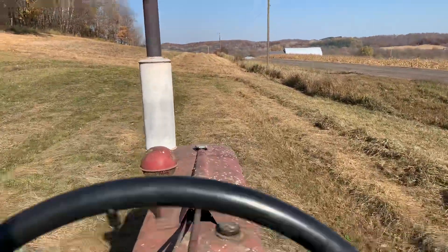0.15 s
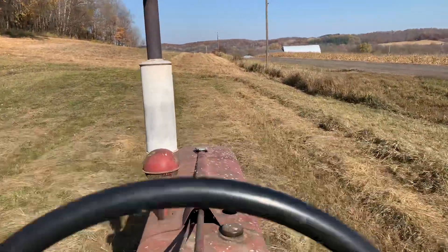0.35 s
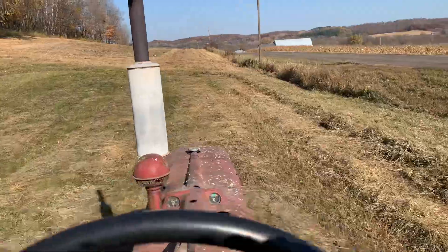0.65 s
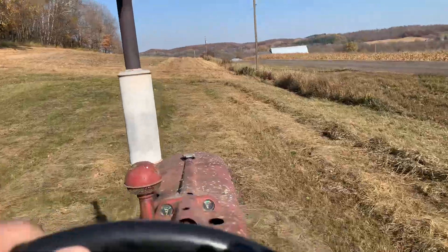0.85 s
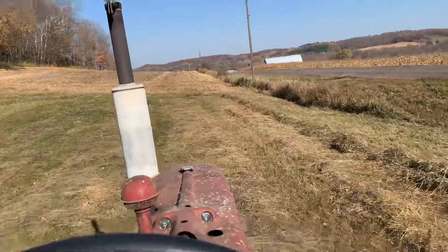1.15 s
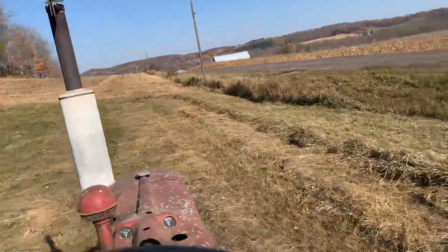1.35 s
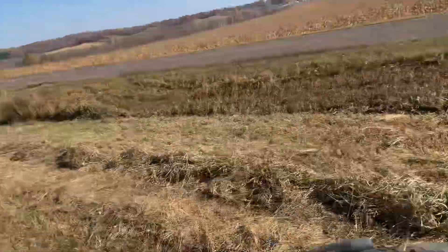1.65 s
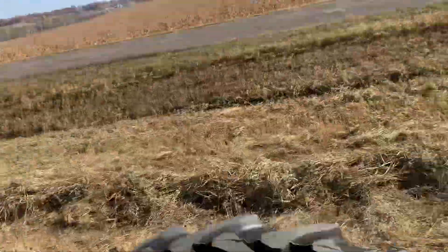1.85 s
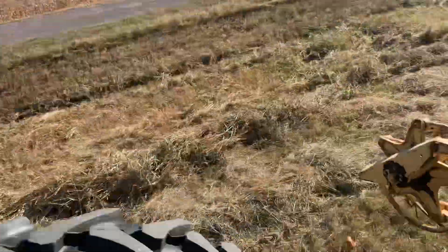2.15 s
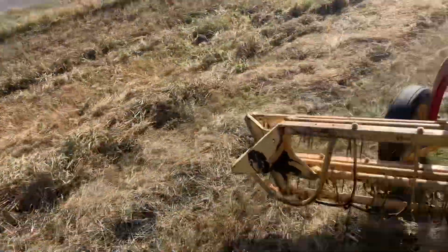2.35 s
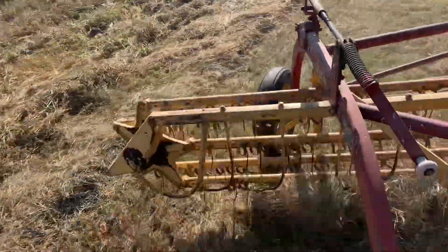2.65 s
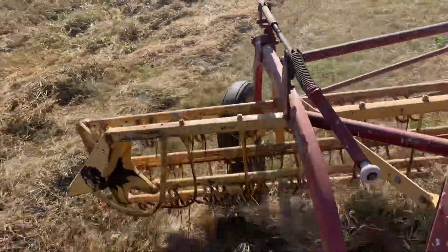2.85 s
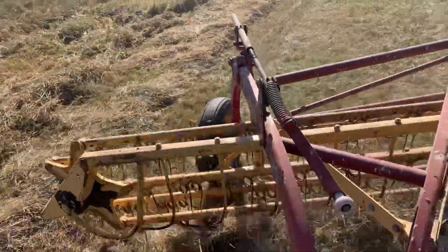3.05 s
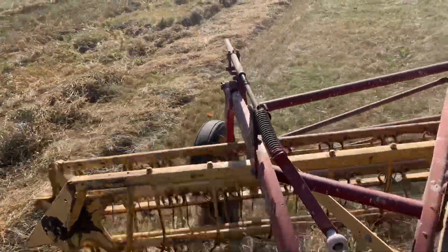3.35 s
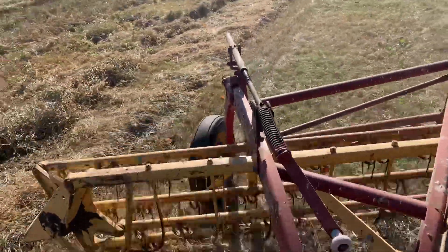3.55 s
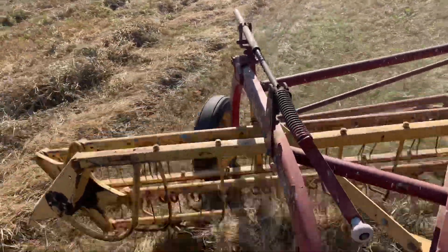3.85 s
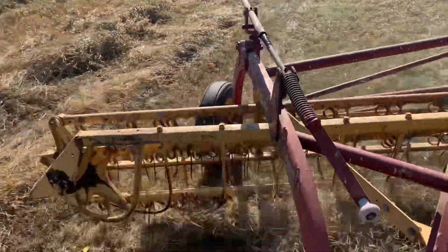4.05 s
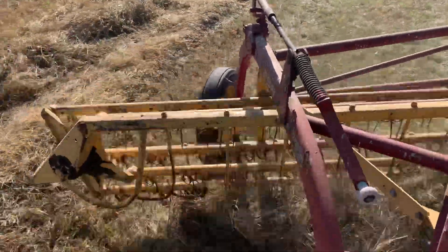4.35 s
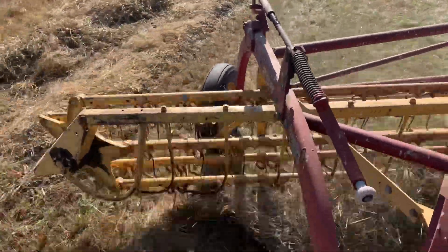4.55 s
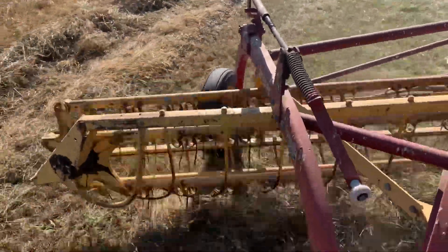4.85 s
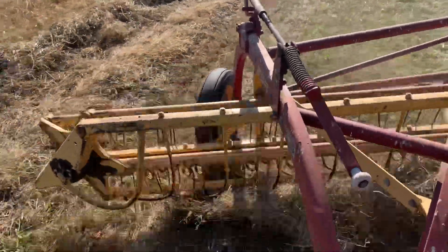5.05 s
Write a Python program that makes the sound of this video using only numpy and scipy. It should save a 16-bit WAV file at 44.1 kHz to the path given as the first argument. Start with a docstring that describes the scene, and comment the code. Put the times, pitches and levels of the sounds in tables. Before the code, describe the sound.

An old four-cylinder tractor works under load in an open field, heard from its seat by a close stereo microphone with no echo. From 0 to 1.5 s a deep, full exhaust hum leads, firing about 45 times a second and swaying in speed roughly twice a second, with broad clatter, dull knocks, gear growl and fine valve ticks. Muffled, light rattles come from behind; soft low air buffets pass near 0.1 and 1.7 s. Between 1.5 and 2.5 s the microphone swings to the towed hay rake: the bass thins markedly and the steel brightens. Tines sing from about 2.0 s, hard double cracks hit near 2.35 s, and frame clanks follow around 2.4 to 2.8 s. From 3 to 5.2 s irregular bright rattles crowd together, strong near 3.0, 3.7, 4.35 and 4.8 s, with short high pings, jingling loose parts and grainy dry hay rustle over the reduced engine drone.

```python
"""On the driver's seat of an old four-cylinder tractor, in a field, with a hay rake in tow behind.
The governor hunts, so the exhaust hum, partials locked to the crankshaft, sways; it thins as the head turns to the rake.
Filtered noise and struck modes make the engine's clatter, knocks, gears and valve ticks.
The rake's loose bars rattle in bursts of bright noise, its spring tines ping as decaying sines,
and they sweep through dry hay, heard as grainy noise; small parts jingle and low buffets of air pass."""
import sys
import numpy as np
from scipy import signal
from scipy.fft import rfft, irfft, next_fast_len
from scipy.io import wavfile

SR = 44100
rng = np.random.default_rng(int(sys.argv[2]) if len(sys.argv) > 2 else 0)


def persist_wave(psi):
    """Save psi, clipped to +-1, as 16-bit WAV."""
    counts = np.round(np.clip(psi, -1, 1) * 32767).astype(np.int16)
    wavfile.write(sys.argv[1], SR, np.atleast_2d(counts).T)


N = 229223
T = np.arange(N) / SR
MID_SIDE = np.array([[1], [-1]])   # sign of the side signal at the left and right ear

# hard rattles of the rake's bars, levels before the steel and frame trims:
# start_s, level_db, frame_share_db, length_s, crack_extra_height (below 0 counts as 0, above 3 as 3)
RATTLES = [(0.275, -21, -11, 0.034, .2), (0.364, -30, -13, .003, 3.5), (0.607, -25, -20, .015, 1),
           (0.62, -22.5, -20, .012, 0.5), (0.7, -20, -5, 0.08, -1.5), (0.856, -20, -27, .029, 0.7),
           (1.127, -20, -14, .012, -1.5), (1.207, -30.5, 1.5, .004, 3.3), (1.295, -26, -26, 0.009, 1.5),
           (1.429, -25.5, 1, 0.081, -0.5), (1.49, -22.5, -2, 0.017, -2), (1.66, -24, -4, 0.091, 0.5),
           (2.088, -21, -4.5, 0.054, -2), (2.171, -25.5, -18, .004, 2), (2.254, -24, -8, 0.0088, 1.2),
           (2.23, -24, -11, 0.022, 0), (2.342, -13, -16, .008, 1), (2.358, -14, -5.5, .014, 0.7),
           (2.488, -29, -2, .008, 0.5), (2.52, -32.5, 6.5, 0.0074, 1), (2.757, -20.5, -16, 0.024, -0.7),
           (2.892, -19, -15, 0.0054, -2), (3.006, -15, -7.5, 0.02, -2), (3.052, -17, -10, 0.018, -2),
           (3.134, -24, -20, 0.016, 0), (3.146, -23.5, -19, .008, -1.5), (3.427, -20, -1.5, 0.048, 0.5),
           (3.437, -15.5, -3, 0.011, -0.5), (3.551, -19.5, -22, .004, 1), (3.567, -17.5, -22, .006, -0.2),
           (3.638, -23.5, 2, 0.0037, 3), (3.677, -13.5, -16, .008, 0.9), (3.694, -13, -5, 0.012, 0.2),
           (3.77, -26, -18, .003, 3), (3.833, -16.5, -13, 0.02, .5), (3.985, -17, -6.5, 0.0072, 0.2),
           (4.106, -17.5, -5, 0.014, -1), (4.223, -18, -24, .016, -4), (4.26, -18, -15, .003, 0),
           (4.357, -13, -12, 0.021, 0.5), (4.522, -21, -4.5, 0.023, -1), (4.677, -23, -14, .005, 3),
           (4.707, -32, -12, .004, 2), (4.776, -21, -18, .004, 0), (4.785, -13, -3, 0.014, -1),
           (4.923, -23, -10, .008, 3), (4.924, -17.5, -4, .008, -1.5), (4.97, -27, -15, .003, 3),
           (5.045, -24, -23, 0.0064, 2), (5.064, -17.5, -25, .006, 0.4), (5.176, -19, -23, .03, 1.1)]
# the reel brings a bar down at a steady beat
BARS_PER_S, FIRST_BAR_S = 7.42, 0.055


def from_db(db):
    """Decibels to gain."""
    return 10 ** (np.asarray(db) / 20)


def rms_one(x):
    """Scale to unit rms."""
    return x / np.sqrt(np.mean(x ** 2) + 1e-20)


def in_time(rows):
    """Each column of a curve, interpolated at every sample."""
    s, *columns = np.transpose(rows)
    return [np.interp(T, s, column) for column in columns]


def at_hz(points, hz):
    """Read a spectrum on a log-frequency axis."""
    point_hz, value = np.transpose(points)
    return np.interp(np.log(hz), np.log(point_hz), value)


def swells(rows):
    """Sum of smooth bumps, each given as (s, height, half length s to 37 % of the height)."""
    return sum(height * np.exp(-((T - s) / length) ** 2) for s, height, length in rows)


def drift(rate):
    """Smooth chance with about `rate` turns a second; rms 1."""
    r = np.exp(-2 * np.pi * rate / SR)
    settled = signal.lfilter([1], [1, -2 * r, r * r], rng.standard_normal(N + SR))[SR:]
    return rms_one(settled)


def noise(spectrum, peaks=()):
    """Stereo noise of a given colour and resonances, as alike in both ears as the ports make it; rms 1."""
    # likeness of the two microphone ports: frequency_hz, left_right_correlation
    likeness = [(60, 0.71), (130, 0.99), (300, 0.71), (640, 0.38), (1400, 0.13), (3000, 0.012),
                (5000, 0.019), (6500, 0.68), (8000, .999)]
    size = next_fast_len(N)
    hz = np.maximum(np.fft.rfftfreq(size, 1 / SR), 1)
    lift_db = sum(db / (1 + (2 * (hz - centre) / width) ** 2) for centre, width, db in peaks)
    colour = from_db(at_hz(spectrum, hz) + lift_db)
    mid, side = rfft(rng.standard_normal((2, size))) * colour
    alike = at_hz(likeness, hz)
    ears = np.sqrt(1 + alike) * mid + np.sqrt(1 - alike) * side * MID_SIDE
    return rms_one(irfft(ears, size)[:, :N])


def ring(drive, hz, t60):
    """One damped mode; a unit click starts a sine of height 1."""
    r, w = from_db(-60 / (t60 * SR)), 2 * np.pi * hz / SR
    return signal.lfilter([0, np.sin(w)], [1, -2 * r * np.cos(w), r * r], drive + 1e-18)


def grain(per_s, spread_db, fall_s, bed):
    """Gain of many small contacts, each sudden and then dying, on an even bed; rms 1."""
    touched = rng.random(N) < per_s / SR
    touches = touched * from_db(spread_db * np.minimum(rng.exponential(1, N), 3))
    power = signal.lfilter([1], [1, -np.exp(-2 / (fall_s * SR))], touches ** 2 + 1e-18)
    return rms_one(np.sqrt(power / power.mean() + bed))


def throb(crank, early_db, late_db, fall_turns):
    """Gain that leaps twice in each turn of the crankshaft and sinks back; rms 1."""
    since_early, since_late = (crank - 0.33) % 1, (crank - 0.7) % 1
    early = early_db * np.exp(-since_early / fall_turns)
    late = late_db * np.exp(-since_late / fall_turns)
    return rms_one(from_db(early + late))


def head_shadow(x, facing, shadow_db, edge_hz):
    """Sound from behind loses treble: all of shadow_db facing the stack, none facing the rake."""
    low = signal.sosfiltfilt(signal.butter(2, edge_hz, fs=SR, output="sos"), x)
    return low + (x - low) * from_db(shadow_db * (1.0 - facing))


def crankshaft():
    """Turns of the crankshaft, two firings each; the governor hunts, so the engine surges twice a second."""
    # surges above the base speed: centre_s, extra_firings_per_s, half_length_s
    surges = [(0.01, 3.5, 0.15), (0.33, 1.5, 0.151), (0.97, 2.6, 0.304), (1.55, 3.0, 0.185),
              (2.0, 2.4, 0.154), (2.53, 3.2, 0.164), (3.0, 2.5, 0.236), (3.56, 2.6, 0.183),
              (4.07, 3.0, 0.159), (4.64, 2.6, 0.191), (5.21, 2.4, 0.139)]
    firings_per_s = 44.5 + swells(surges)
    return 0.217 + np.cumsum(firings_per_s / 2) / SR


def exhaust(crank, facing, left_first_ms):
    """Clean partials locked to the crankshaft; unequal cylinders give the odd ones, only the weak ones waver."""
    # loudness at the seat, before the partials' own levels and the dips: time_s, boom_db, drone_db
    loudness = [(0.0, -19.5, -24.5), (0.55, -16, -24.5), (1.17, -17.5, -25), (1.45, -15.5, -26.5),
                (1.8, -20.5, -28), (2.5, -26.5, -27), (2.8, -29.5, -27), (3.6, -27.5, -30),
                (4.2, -28.5, -31.5), (5.2, -29, -29)]
    # partials: multiple_of_crank_speed, level_db, share (0 follows the boom to 1 follows the drone)
    partials = [(2, -24, 0.38), (4, 1, 0.18), (5, -38, 0.18), (6, 3.5, 0.99), (7, -10, 1), (8, -9, 0.73),
                (9, -25, 0), (10, -37.5, 0), (11, -25, 0.23), (12, -21, 0.87), (14, -31, 0.13),
                (16, -27, 0.18), (18, -22, 0.31), (23, -21, 0.17)]
    # brief dips of the hum: centre_s, boom_loss_db
    dips = [(0.125, 10), (1.72, 5), (2.73, 7), (3.11, 3.5), (3.74, 5), (4.31, 6.5), (4.84, 6)]
    dip_half_s, drone_dip_share = 0.07, 0.29
    drone_lag_turns, waver_spread_db = 0.019, 1.5

    boom_db, drone_db = in_time(loudness)
    dip_db = swells((s, db, dip_half_s) for s, db in dips)
    boom_db = boom_db - dip_db
    drone_db = drone_db - drone_dip_share * dip_db
    hum = np.zeros(N)
    for multiple, level_db, share in partials:
        base_db = boom_db + share * (drone_db - boom_db)
        turn = crank if multiple < 6 else crank - drone_lag_turns
        waver_db = 0 if multiple in (4, 6) else waver_spread_db * drift(5)
        gain = from_db(base_db + level_db + waver_db) * np.sqrt(2)
        hum += gain * np.cos(2 * np.pi * multiple * turn)
    later = np.interp(T - left_first_ms / 1000, T, hum)
    return np.array([hum, later]) * from_db(0.6 * facing * MID_SIDE)


def clatter(crank):
    """The engine's broad mechanical noise, a coloured noise leaping at each firing; rms 1 before the throb."""
    # colour of the clatter: frequency_hz, density_db
    clatter_spectrum = [(25, -45), (45, 6), (65, -7.5), (110, 1), (200, -1.5), (300, -3), (420, 0.5),
                        (560, -7.5), (750, -6.5), (1100, -12.5), (2500, -33.5)]
    return noise(clatter_spectrum) * throb(crank, early_db=2.4, late_db=2.5, fall_turns=0.15)


def panels(crank):
    """Each firing knocks the sheet metal, with chance strength, over a steady shaking; rms 1."""
    # ringing of bonnet, block and pipe: frequency_hz, level_db, t60_s
    panel_modes = [(282.2, 0, 0.16), (367.3, -2.5, 0.17), (409.8, 3, 0.11), (526.7, -6.5, 0.13),
                   (669.3, -5, 0.1), (836.4, -8.5, 0.14), (1217, -8, 0.065)]
    sway_s, scatter, shake = 0.0004, 0.67, 0.023   # the panels flex, so their notes waver
    at = np.flatnonzero(np.diff(np.floor(2 * (crank - 0.3))))
    out = np.zeros((2, N))
    for hz, level_db, t60 in panel_modes:
        drive = shake * rng.standard_normal((2, N))
        drive[0, at] += 1 + scatter * rng.standard_normal(len(at))
        flexed = T + sway_s * drift(5.84)
        mid, side = (np.interp(flexed, T, note) for note in ring(drive, hz, t60))
        width = min(hz / 1200, 1)   # low modes stay near the middle
        out += from_db(level_db) * rms_one(mid + side * width * MID_SIDE)
    return rms_one(out)


def knocks(crank):
    """Pistons and bearings take up their play on every turn: short dry knocks of uneven strength."""
    # knocks in each turn of the crankshaft: share_of_turn, frequency_hz, level_db
    knock_table = [(.32, 380, -16), (.37, 1250, -21), (.69, 690, -12), (.75, 2700, -25), (.82, 1350, -19)]
    contact_turns, ringing_cycles = 0.035, 9
    out = 0
    for share, hz, db in knock_table:
        contact = np.exp(-((crank - share) % 1) / contact_turns)
        mid, side = ring(contact * rng.standard_normal((2, N)), hz, ringing_cycles / hz)
        out = out + from_db(db) * rms_one(mid + 0.5 * side * MID_SIDE)
    return out


def gears(crank, facing):
    """Gear teeth make a grainy noise that throbs with the crankshaft, coloured by the housing's resonances."""
    # level before a 3 dB lift: time_s, level_db
    gear_level = [(0.0, -33.5), (0.7, -31.5), (1.4, -35.5), (1.8, -32), (2.65, -37.5), (3.05, -31.5),
                  (3.3, -37.5), (3.7, -31), (3.95, -33), (4.3, -30), (4.6, -34.5), (5.2, -31.5)]
    # colour of the gear noise: frequency_hz, density_db
    gear_spectrum = [(300, -8.5), (600, -2.5), (900, -7.5), (1100, -3.5), (1300, -4), (1650, -7.5),
                     (2400, -6.5), (3200, -10), (4500, -12), (8000, -48)]
    # resonances of gear housing and covers: frequency_hz, width_hz, lift_db
    housing = [(690, 39, 7), (838.6, 18, 13), (919, 78, 8.5), (1188, 39, 10), (1344, 44, 5),
               (1396, 65, 7.5), (1527, 36, 4.5), (1753, 60, 6.5), (1940, 44, 4), (3030, 67, 5.5)]
    gear_db, = in_time(gear_level)
    out = from_db(gear_db + 3.0) * noise(gear_spectrum, housing)
    out *= throb(crank, early_db=1.0, late_db=4.0 - 5.6 * facing, fall_turns=0.15)
    out *= grain(per_s=280, spread_db=5.5, fall_s=0.032, bed=0.56)
    return head_shadow(out, facing, shadow_db=-2, edge_hz=2100)


def valves(crank):
    """Two loose tappets tick in turn, each tick of chance strength, half as high at the right ear."""
    # ringing of the valve gear: frequency_hz, level_db, t60_s
    valve_modes = [(3130, 0, 0.06), (3639, -2, 0.04), (4210, 9, 0.06)]
    at = np.flatnonzero(np.diff(np.floor(2 * (crank - 0.29))))
    out = np.zeros((2, N))
    for hz, level_db, t60 in valve_modes:
        ticks = np.zeros(N)
        ticks[at] = from_db(level_db + 6.0 * rng.standard_normal(len(at)))
        out += ring(ticks, hz, t60)
    return rms_one(out) * [[1], [0.5]]


def bar_beats():
    """Light rattles at the beat of the reel, wherever no hard one takes their place."""
    level_db, scatter_db, frame_share_db, jitter_s, length_s = -34.5, 2, -15, 0.01, 0.12
    beats = np.arange(FIRST_BAR_S, T[-1], 1 / BARS_PER_S)
    late, louder = rng.standard_normal((2, len(beats)))
    starts = beats + jitter_s * late
    levels = level_db + scatter_db * louder
    hard = np.array(RATTLES)[:, 0]
    return [(s, db, frame_share_db, length_s, 0) for s, db in zip(starts, levels)
            if np.abs(s - hard).min() > 0.5 / BARS_PER_S]


def rattles():
    """A loose bar cracks, then chatters: a dense spray of bright contacts, with the frame sounding below."""
    # colour of the bars' steel: frequency_hz, density_db
    steel_spectrum = [(2000, -42), (3500, -8), (4500, 0.5), (5000, -1.5), (5600, -4), (6800, 4.5),
                      (8500, 5), (10000, 3), (11500, 3), (14000, 1.5), (15800, -2)]
    # resonances of the bars: frequency_hz, width_hz, lift_db
    bar_peaks = [(4010, 67, 11.5), (4940, 99, 7.5), (7360, 89, -2)]
    # colour of the frame: frequency_hz, density_db
    frame_spectrum = [(500, -20), (1200, 2.5), (2400, 0), (3500, 0.5), (5000, -6.5), (8000, -9)]
    crack_s, sag_s, fall_s = 0.004, 0.31, 0.031   # dying of the crack, of the chatter, and past its length
    steel_trim_db, frame_trim_db = -9.0, -5.0

    bright_power, dull_power = np.zeros(N), np.zeros(N)
    chatter = grain(per_s=610, spread_db=2.5, fall_s=0.0054, bed=0.43)
    chatter = np.minimum(chatter, 1.6)   # the hardest contact, as a multiple of the rms
    for s, db, share_db, length, crack in RATTLES + bar_beats():
        start = int(s * SR)
        now = slice(max(start, 0), start + SR // 3)
        age = np.maximum(T[now] - s, 0)
        strike = np.exp(-age / crack_s)
        spray = chatter[now] * np.exp(-age / sag_s - np.maximum(age - length, 0) / fall_s)
        shape = (1 + np.clip(crack, 0, 3)) * strike + (1 - strike) * spray
        bright_power[now] += (from_db(db) * shape) ** 2
        dull_power[now] += (from_db(db + share_db) * shape) ** 2
    bright = from_db(steel_trim_db) * np.sqrt(bright_power) * noise(steel_spectrum, bar_peaks)
    dull = from_db(frame_trim_db) * np.sqrt(dull_power) * noise(frame_spectrum)
    return bright + dull


def hay():
    """Tines sweep through dry hay: many small contacts of stalks, as a bright grainy noise."""
    # rustle before a 2 dB lift: time_s, level_db
    rustle = [(0.05, -37.5), (0.69, -35), (1.01, -38), (2.4, -34), (2.65, -39), (3.4, -35), (3.56, -30),
              (3.95, -36.5), (4.2, -33.5), (4.65, -35.5), (4.87, -32.5), (5.15, -35)]
    # colour of the hay: frequency_hz, density_db
    hay_spectrum = [(1200, -0.5), (2500, 4), (4000, -2.5), (5000, 1), (5700, -0.5), (6800, 5.5), (8700, 0),
                    (10000, 3.5), (13000, -1.5), (15800, 0.5)]
    hay_db, = in_time(rustle)
    return from_db(hay_db + 2.0) * noise(hay_spectrum) * grain(per_s=170, spread_db=3.0, fall_s=0.015, bed=0.47)


def steel(drive, t60, ring_db, count, size):
    """Tines and bars, each with its own note, ring on after what shakes the rake; each bar takes its turn."""
    age, out = T[:SR // 12], drive
    lowest_bar = np.floor((T - FIRST_BAR_S) * BARS_PER_S + 0.5) % size
    for bar in range(size):
        hz, strength = rng.uniform(3018, 15500, count), rng.standard_normal(count)
        notes = strength @ np.sin(2 * np.pi * hz[:, None] * age)
        notes *= from_db(-60 * age / t60)
        notes *= from_db(ring_db) / np.linalg.norm(notes)
        out = out + signal.oaconvolve(drive * (lowest_bar == bar), notes[None], axes=1)[:, :N]
    return out


def tines():
    """A spring tine slips free and sings on one unsteady note, buzzing against its bar."""
    # loud tines and links ringing, before a 6 dB lift: start_s, pitch_hz, level_db, t60_s
    pings = [(2.052, 845, -32.5, 0.73), (2.115, 1905, -32, 0.32), (2.135, 1956, -32, 0.17),
             (2.345, 2200, -31, 0.19), (2.34, 4950, -31.5, 0.21), (2.368, 948, -31, 0.32),
             (2.03, 4940, -35.5, 0.19), (2.13, 5000, -35, 0.11), (3.015, 4990, -37, 0.24),
             (3.135, 4960, -30.5, 0.13), (3.455, 6920, -27, 0.2), (3.505, 5030, -34, 0.27),
             (3.612, 4980, -32, 0.11), (3.685, 2336, -25.5, 0.16), (3.694, 4930, -29, 0.19),
             (3.829, 2490, -29, 0.19), (4.226, 6620, -19.5, 0.057), (4.385, 7100, -27, .15),
             (4.571, 6900, -35, 0.18), (4.587, 4960, -33, 0.15), (4.809, 7000, -26, 0.11),
             (4.969, 6550, -25, 0.056), (5.138, 4960, -30, 0.17)]
    rise_s = 0.003
    out = np.zeros((2, N))
    wobble = 0.35 * drift(49)   # radians
    buzz = rms_one(from_db(3 * drift(150)))
    for s, hz, ping_db, t60 in pings:
        now = slice(int(s * SR), int((s + t60) * SR))
        age = T[now] - T[now][0]
        decay = from_db(6 + ping_db - 60 * age / t60)
        shape = decay * (1 - np.exp(-age / rise_s)) * buzz[now]
        arrival = rng.uniform(-0.95, 1.0) * MID_SIDE   # phase at each ear, radians
        out[:, now] += shape * np.sin(2 * np.pi * hz * age + wobble[now] + arrival)
    return out


def clanks():
    """A joint of the frame takes up its play: a short scrape sets the frame's modes ringing."""
    # clanks, before a 2 dB lift: start_s, level_db
    clank_table = [(1.205, -53), (2.296, -32), (2.359, -37), (2.44, -27), (2.526, -29.5), (2.781, -27),
                   (2.965, -35), (3.362, -34), (3.637, -44), (3.692, -40)]
    # what the frame rings with: frequency_hz, level_db, t60_s
    frame_modes = [(2130, 3.5, 0.046), (2260, -17, 0.035), (2360, 6, 0.053), (2690, 6.5, 0.038),
                   (2840, 0, 0.023), (3010, 4.5, 0.032), (3450, -13, 0.02)]
    scrape_s = 0.0065
    blows = sum(from_db(db) * (T >= s) * np.exp(-np.maximum(T - s, 0) / scrape_s) for s, db in clank_table)
    drive = blows * rng.standard_normal((2, N)) / np.sqrt(scrape_s * SR)
    return from_db(2.0) * sum(from_db(db) * ring(drive, hz, t60) for hz, db, t60 in frame_modes)


def jingle(per_s, spread_db, t60, count):
    """Small loose parts touch at random, each ringing briefly at its own pitch and place; rms 1."""
    out = np.zeros((2, N))
    touches_each = int(per_s * N / SR / count)
    for hz in np.geomspace(900, 4000, count):
        touches = np.zeros(N)
        when, force, sign = rng.random((3, touches_each))
        touches[(when * N).astype(int)] = from_db(spread_db * force ** 3) * np.sign(sign - 0.5)
        place = np.cos(rng.uniform(0, np.pi) + np.array([[0], [np.pi / 2]]))
        out += rms_one(ring(touches, hz, t60)) / np.sqrt(hz) * place
    return rms_one(out)


def buffets():
    """Brief low swells of moving air."""
    # buffets: centre_s, level_db, half_length_s
    buffet_table = [(0.122, -27, 0.035), (1.69, -27, 0.028)]
    swell = swells((s, from_db(db), length) for s, db, length in buffet_table)
    # colour: frequency_hz, density_db
    return swell * noise([(25, -51), (50, 0), (72, 30), (110, -22.0), (250, 0), (1000, -66)])


def scene():
    """Engine ahead and rake behind, as the head turns between them on the seat."""
    # the listener's head: time_s, facing (0 the stack to 1 the rake), exhaust_left_ear_first_ms
    head = [(0, 0.52, 0.041), (1.3, 0.06, 0.14), (1.8, 0.57, 0.89), (2.3, 0.67, 0.96), (2.7, 0.85, 0.42),
            (5.2, 0.81, 0.48)]
    # level shared by clatter, panels and knocks, before their trims: time_s, level_db
    clatter_level = [(0.0, -27.5), (0.65, -24), (1.1, -25.5), (1.6, -26.5), (2.4, -28.5), (3.2, -30),
                     (3.9, -31.5), (4.3, -31), (4.75, -28), (5.2, -32)]
    facing, left_first_ms = in_time(head)
    clatter_db, = in_time(clatter_level)
    crank = crankshaft()

    engine = exhaust(crank, facing, left_first_ms)
    engine += from_db(clatter_db - 0.4) * clatter(crank)
    engine += from_db(clatter_db - 4.0) * panels(crank)
    engine += from_db(clatter_db) * knocks(crank)
    engine += from_db(-42.5 - 13 * facing) * valves(crank)   # fainter as the head turns away

    rake = steel(hay() + rattles(), t60=0.041, ring_db=-5, count=70, size=5)
    rake += tines() + clanks()
    rake = head_shadow(rake, facing, shadow_db=-16, edge_hz=12500)
    to_the_right = from_db(-0.3 * MID_SIDE)
    behind = (gears(crank, facing) + rake) * to_the_right

    loose = from_db(-41.5 + 7.3 * facing) * jingle(per_s=200, spread_db=7, t60=0.1, count=28)
    return engine + behind + loose + buffets()


def record(dry):
    """The recorder sheds the deepest bass, turns the right channel ahead in phase in the treble, and cuts the
    top steeply."""
    # phase lead of the right channel: frequency_hz, lead_turns
    right_lead = [(0, 0), (6200, 0), (8550, .5), (11000, 1), (13300, 1.5), (15900, 2)]
    low_cut_hz, cutoff_hz = 32, 15900
    hz = np.maximum(np.fft.rfftfreq(N, 1 / SR), 1)
    lead = np.interp(hz, *np.transpose(right_lead))
    low_cut = 1 / np.sqrt(1 + (low_cut_hz / hz) ** 8)
    turned = np.exp(2j * np.pi * lead * np.array([[0], [1]]))
    ports = irfft(rfft(dry) * low_cut * turned, N)
    return signal.sosfilt(signal.ellip(12, 0.1, 80, cutoff_hz, fs=SR, output="sos"), ports)


dry = scene()
out = record(dry)
persist_wave(out)
```